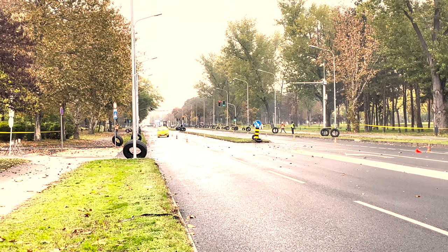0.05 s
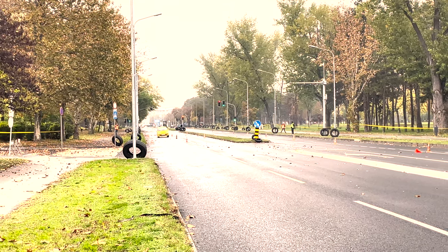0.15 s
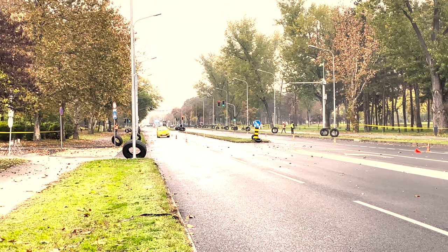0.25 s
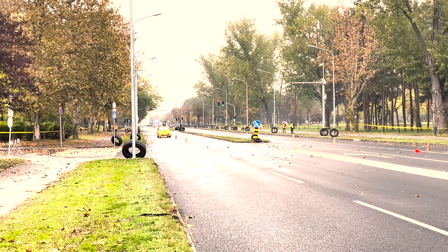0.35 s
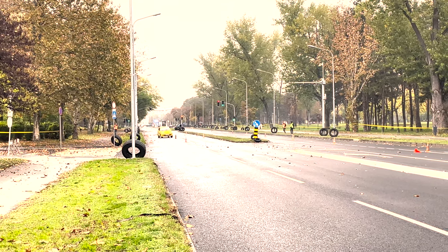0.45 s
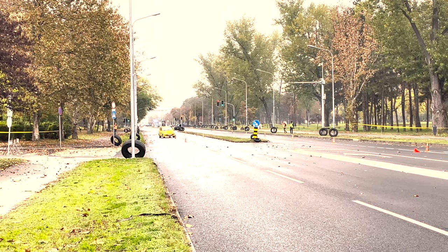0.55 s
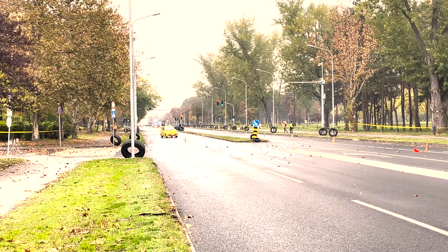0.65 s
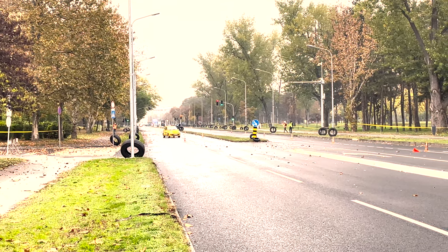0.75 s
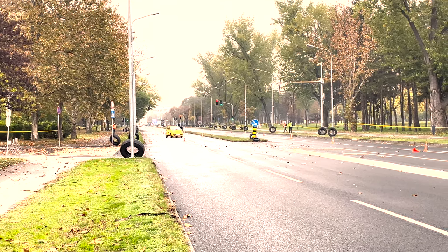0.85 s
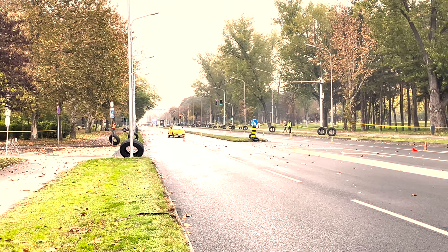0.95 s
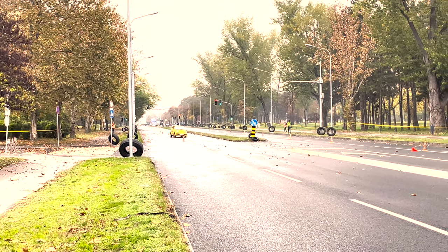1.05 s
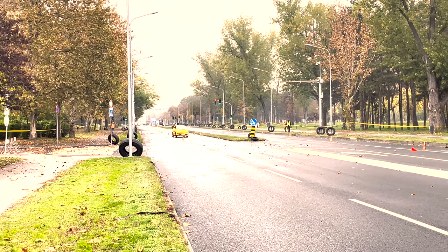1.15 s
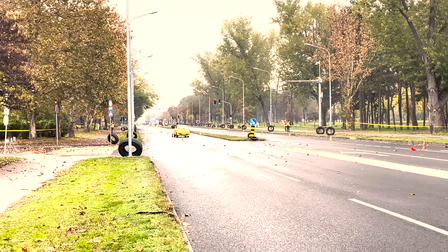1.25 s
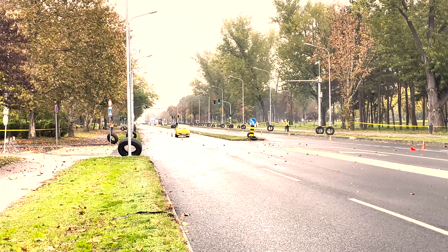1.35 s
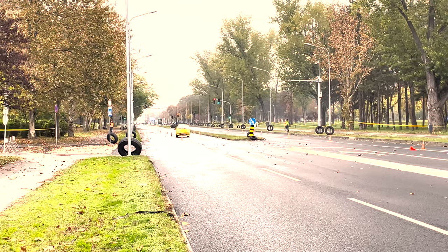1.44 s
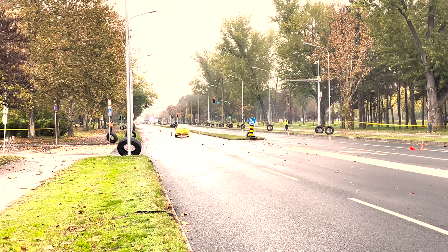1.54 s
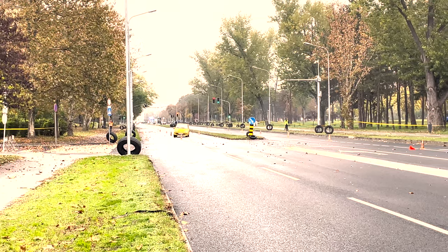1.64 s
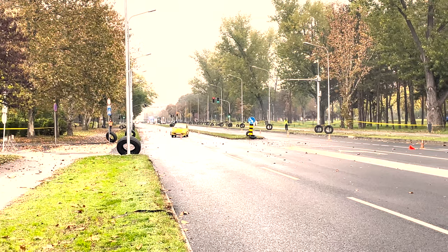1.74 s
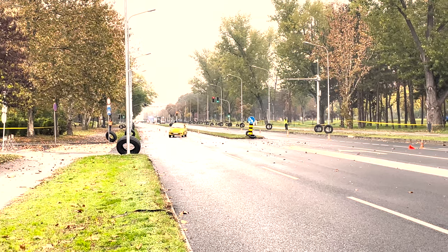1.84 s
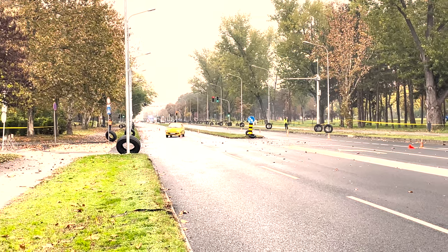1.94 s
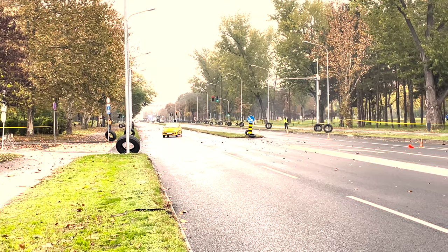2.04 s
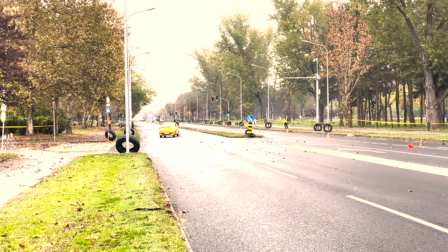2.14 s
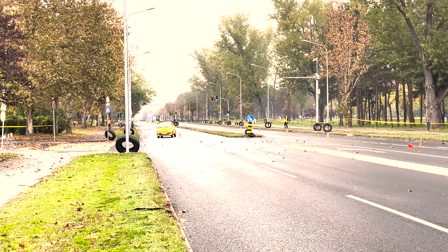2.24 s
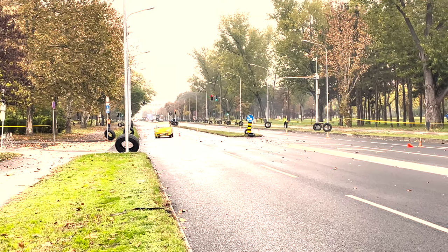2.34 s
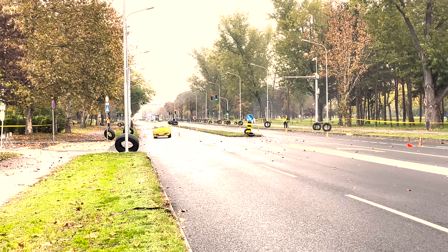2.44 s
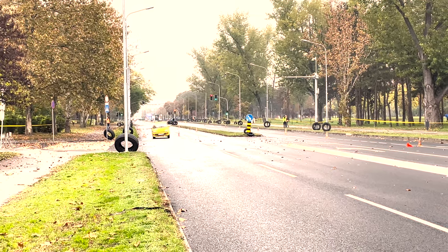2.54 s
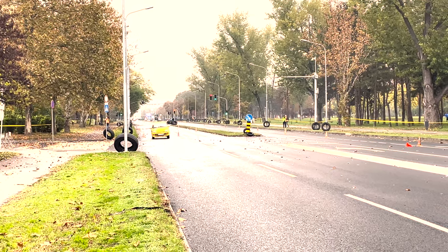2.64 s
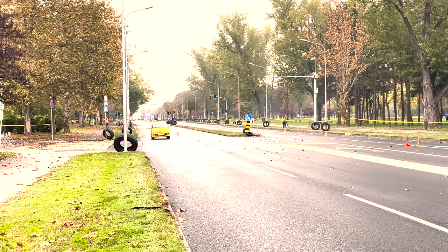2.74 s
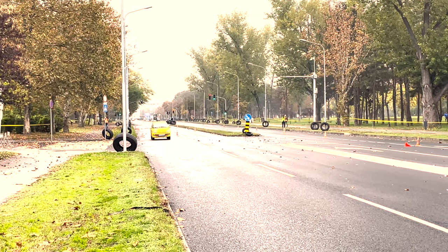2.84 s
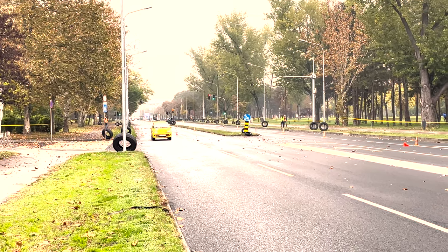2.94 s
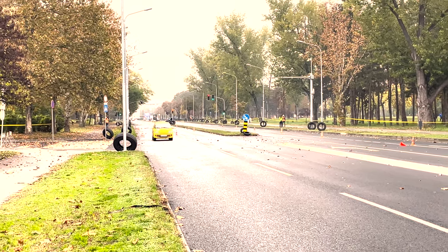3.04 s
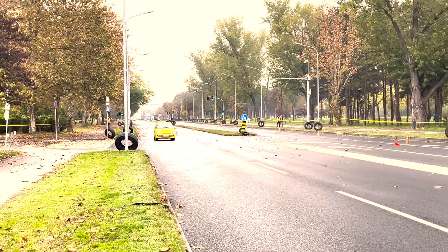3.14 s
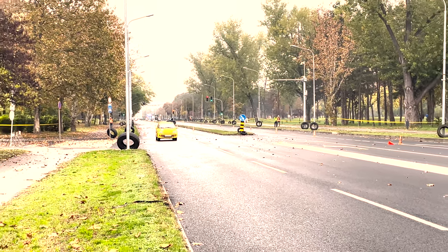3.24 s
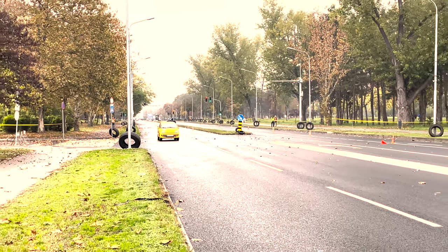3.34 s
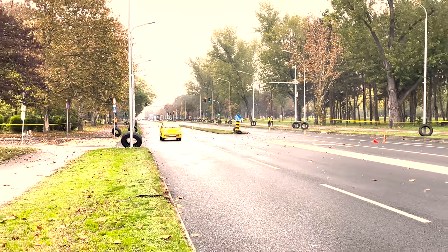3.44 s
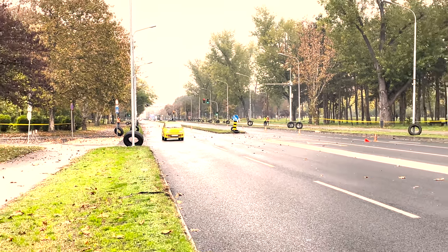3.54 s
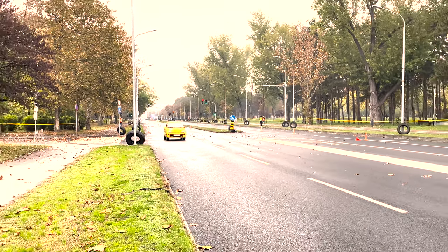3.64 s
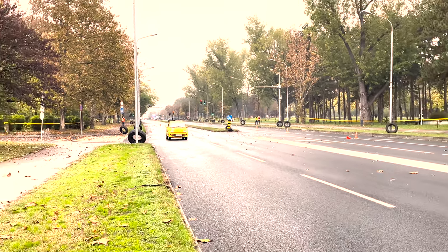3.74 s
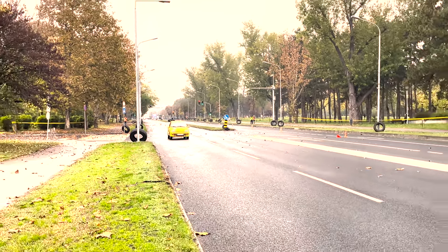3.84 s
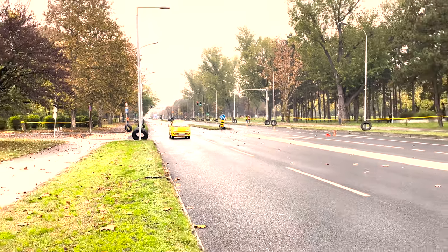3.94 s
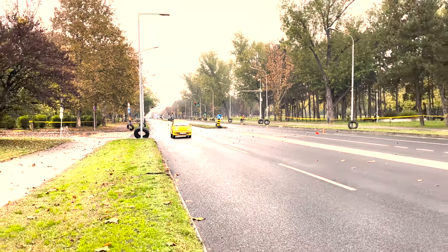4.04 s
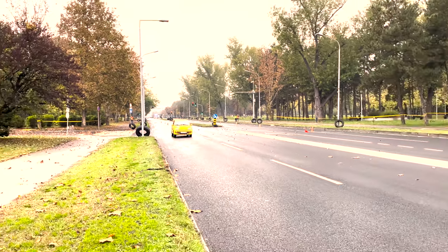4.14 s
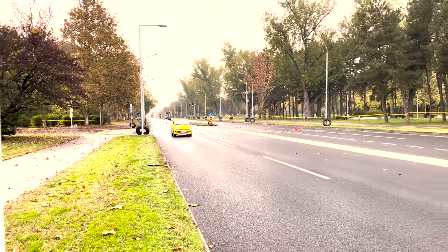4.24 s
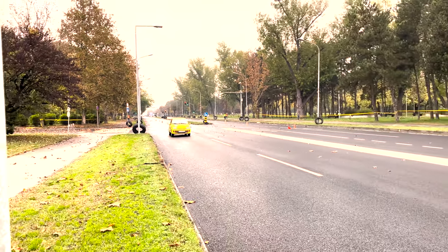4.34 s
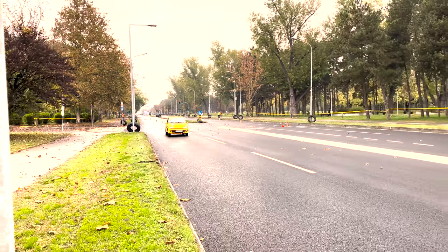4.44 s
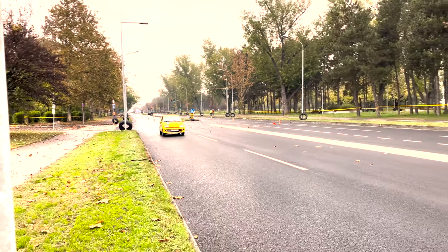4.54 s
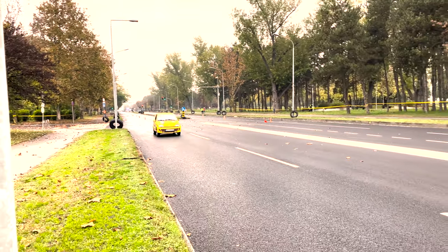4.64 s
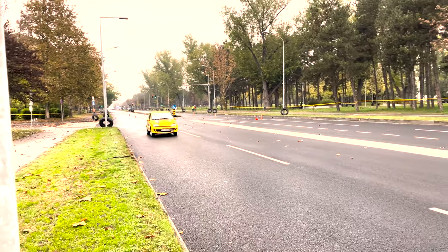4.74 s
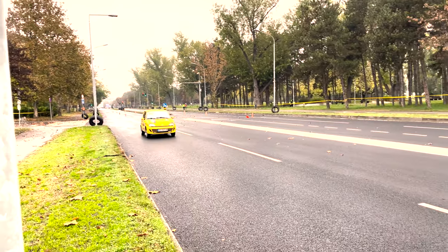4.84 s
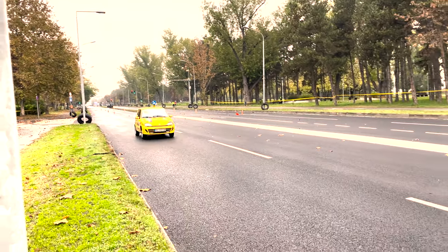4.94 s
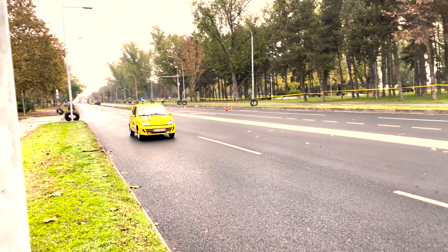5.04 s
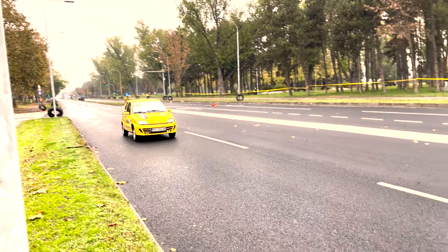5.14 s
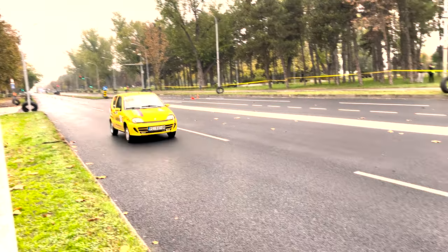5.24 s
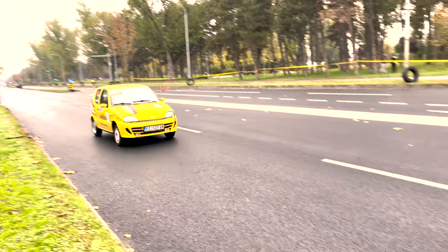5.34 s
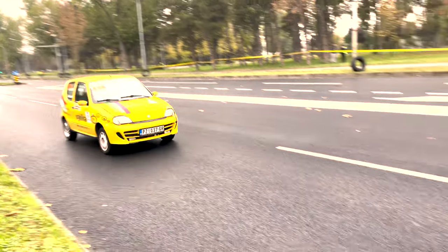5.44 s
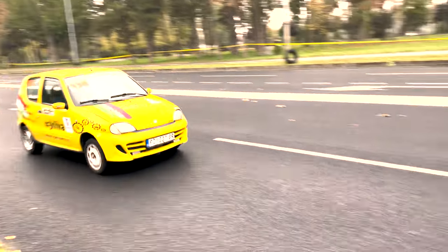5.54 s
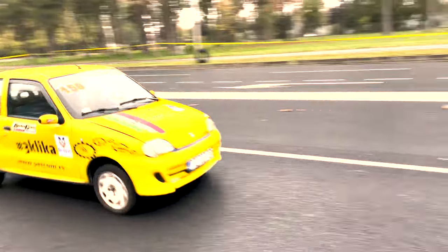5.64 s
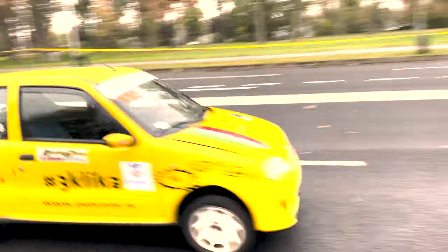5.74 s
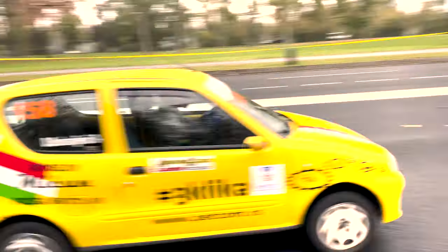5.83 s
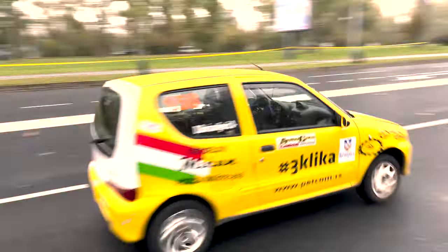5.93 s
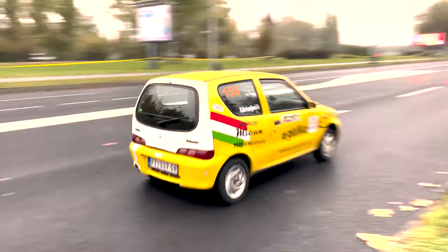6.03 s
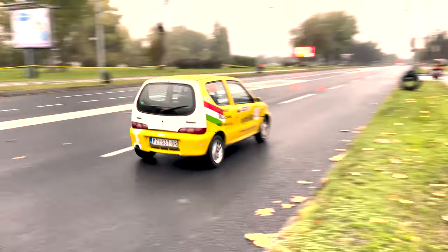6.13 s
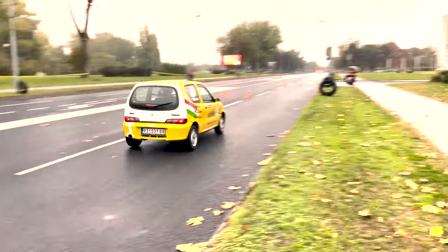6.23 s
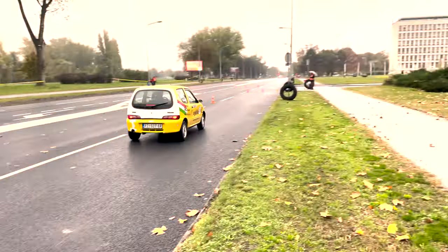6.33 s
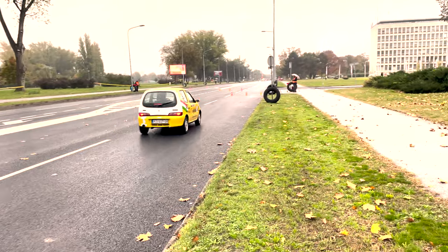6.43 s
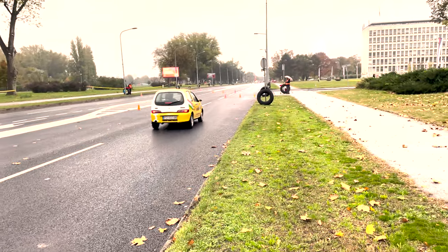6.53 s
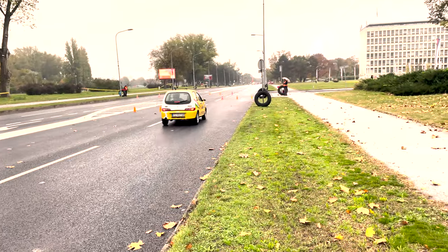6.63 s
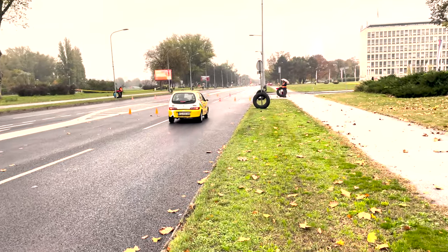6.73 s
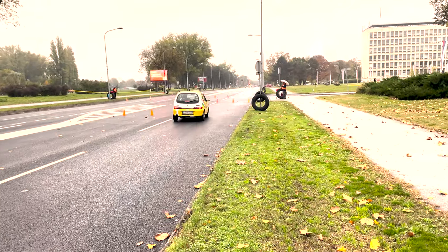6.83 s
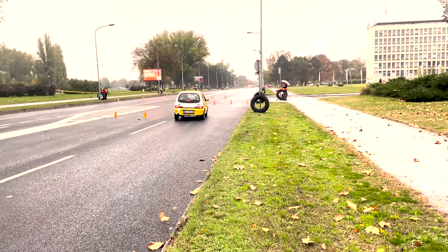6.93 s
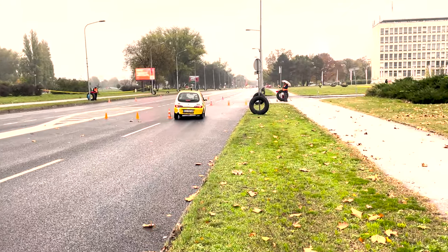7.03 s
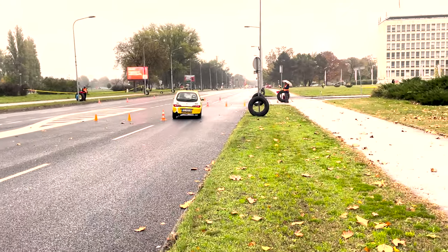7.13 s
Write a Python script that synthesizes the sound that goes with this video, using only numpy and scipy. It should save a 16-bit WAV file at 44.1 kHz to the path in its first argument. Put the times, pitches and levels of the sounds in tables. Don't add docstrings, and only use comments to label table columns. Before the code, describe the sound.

Far-off squeals and a rising engine, a small four-cylinder sweeps close by on wet asphalt, lifts off and fades among wind thumps.

```python
import sys
import numpy as np
from scipy import signal
from scipy.fft import rfft, irfft
from scipy.io import wavfile
from scipy.ndimage import uniform_filter1d, map_coordinates

SR = 44100
rng = np.random.default_rng(int(sys.argv[2]) if len(sys.argv) > 2 else 0)


def natural_amplitude(level_db):
    exponent = np.asarray(level_db, float) / 20
    return 10 ** exponent


def generate_wav(sig):
    pcm = np.round(np.clip(np.atleast_2d(sig).T, -1, 1) * 32767).astype(np.int16)
    wavfile.write(sys.argv[1], SR, pcm)


N = 316638


def unit(x):
    return x / np.sqrt(np.mean(x ** 2) + 1e-20)


def along(points, hz):
    f, v = np.transpose(points)
    return np.interp(np.log(hz + 1), np.log(f + 1), v)


def curves(rows):
    s, *cols = np.transpose(rows)
    return [np.interp(np.arange(N) / SR, s, c) for c in cols]


def bumps(rows, x):
    return sum(db * np.exp(-((x - centre) / width) ** 2) for centre, width, db in rows)


def phase(hz):
    return 2 * np.pi * np.cumsum(hz) / SR


def wobble(rate, step=1, size=N):
    fine = np.arange(0, size * rate / SR + 1, .125)
    smooth = map_coordinates(rng.standard_normal(len(fine) // 8 + 4), [fine])
    return np.interp(np.arange(0, size, step) * rate / SR, fine, smooth)


def filtered(x, response):
    m = (N // 8192 + 2) * 8192
    return irfft(rfft(x, m) * response(np.fft.rfftfreq(m, 1 / SR)), m)[..., :N]


def rush(spectrum, patchy_db):
    z = signal.stft(rng.standard_normal((2, N)), nperseg=512)[2]
    field = uniform_filter1d(rng.standard_normal(z.shape[1:]), size=6, axis=0)
    field = uniform_filter1d(field, size=12, axis=1)
    pair = signal.istft(z * natural_amplitude(patchy_db * unit(field)), nperseg=512)[1][:, :N]
    return unit(filtered(pair, lambda hz: natural_amplitude(along(spectrum, hz))))


def past(at_s=5.65, turn_s=0.54):
    return .5 + .5 * np.tanh((np.arange(N) / SR - at_s) / turn_s)


# (frequency [Hz], density [dB per Hz])
TRAFFIC_SPECTRUM = [(120, -120), (170, 2.5), (300, -1.5), (500, -5.5), (800, -17), (1500, -120)]


def traffic():
    return natural_amplitude(-49.5 + 1.6 * wobble(2.6)) * rush(TRAFFIC_SPECTRUM, patchy_db=1.5)


# (time [s], exhaust frequency [Hz], level [dB])
FOLLOWER_EXHAUST = [(0.0, 189.1, -48), (0.02, 189.1, -62), (0.03, 190.3, -46.5), (0.17, 190.3, -50),
                    (1.06, 199.8, -41.5), (1.63, 205.2, -43), (1.74, 204.9, -42.5), (2.3, 209.4, -44.5)]


def follower():
    hz, level_db = curves(FOLLOWER_EXHAUST + [(2.6, 207, -70)])
    line = natural_amplitude(level_db + 1.3 * wobble(12)) * np.sin(phase(hz))
    return np.array([line, np.roll(line, 310)])


# (time [s], level [dB])
BUFFETS = [(0, -45), (0.8, -39), (3.0, -39), (4.0, -36), (4.54, -40.5), (4.96, -35), (5.28, -39),
           (6.38, -41), (6.72, -45.5), (7.18, -46)]
# (frequency [Hz], density [dB per Hz])
RUMBLE_SPECTRUM = [(15, -120), (24, -29), (34, -21), (45, -6), (60, -6.5), (90, -11.5), (140, -15),
                   (300, -26.5), (600, -120)]
# (time [s], peak [dB], final frequency [Hz])
GUST_THUMPS = [(0.018, -28.5, 65.4), (0.261, -30.5, 56), (0.374, -31, 58), (0.471, -32, 52),
               (0.7, -27.5, 57.7), (0.76, -28, 57.7), (0.865, -24, 55.6), (1.026, -23.5, 54.7),
               (1.129, -33, 51.87), (1.408, -26, 63), (1.629, -29, 52.5), (1.79, -32, 48.2),
               (1.939, -28, 52), (2.07, -33, 62), (2.201, -27.5, 60.4), (2.349, -19, 64),
               (2.548, -28.5, 62.3), (2.612, -26, 57.8), (3.039, -18, 61.6), (3.271, -25, 52.4),
               (3.557, -35.5, 57.9), (3.861, -28, 80), (4.17, -24.5, 54), (4.442, -40, 60.2),
               (4.845, -23, 59), (4.934, -24, 66.4), (5.08, -33, 62.3), (5.502, -29, 80),
               (5.978, -21.5, 65), (6.282, -29, 62.15), (6.42, -29, 66.5)]


def wind():
    buffet_db, = curves(BUFFETS)
    out = natural_amplitude(buffet_db - 1.0) * unit(natural_amplitude(wobble(15)) * rush(RUMBLE_SPECTRUM, patchy_db=0.5))
    t = np.arange(SR // 8) / SR
    swell = t / 0.019 * np.exp(1 - t / 0.016)
    for s, db, hz in GUST_THUMPS:
        glide = 2 * np.pi * hz * (t + 0.012 * (1 - np.exp(-t / 0.0072)))
        ports = np.array([[1], [0.44 * np.sign(rng.standard_normal())]])
        out[:, round(s * SR):][:, :len(t)] += ports * natural_amplitude(db + 2.5) * swell * np.sin(glide) * 0.66
    return out


# (time [s], peak [dB], ring frequency [Hz], crack [dB])
GRIT_TICKS = [
    (0.9302, -55, 6900, -23),
    (3.6791, -40, 6600, -9),
    (6.538, -36, 6740, 3),
    (7.0219, -53, 7070, -9),
]


def ticks():
    out, t = np.zeros((2, N + SR)), np.arange(SR // 40) / SR
    for s, db, hz, crack_db in GRIT_TICKS:
        crack = natural_amplitude(crack_db + 9.5 - 60 * t / 0.048) * rng.standard_normal((2, len(t)))
        ring = np.sin(2 * np.pi * hz * t)
        out[:, round(s * SR):][:, :len(t)] += natural_amplitude(db - 60 * t / 0.02) * (crack + ring)
    return filtered(out[:, :N], lambda hz: 1 / (1 + (hz / 12300) ** 8) / (1 + (5500 / (hz + 1)) ** 8))


# (time [s], slip frequency [Hz], level [dB])
SQUEAL_TRACKS = [
    [(0, 1340, -31), (.008, 1340, -26), (.014, 1334, -29), (.026, 1422, -28), (.034, 1334, -33),
     (.038, 1273, -31), (.046, 1260, -30), (.052, 1264, -42), (.066, 1348, -38), (.073, 1446, -35),
     (.097, 1286, -37.5), (.107, 1250, -46), (.2, 1245, -49), (.24, 1280, -58), (.3, 1300, -68)],
    [(1.4, 1148, -56), (1.413, 1165, -41), (1.44, 1110, -39), (1.47, 1108, -45), (1.49, 1092, -33),
     (1.52, 1079, -38), (1.553, 1068, -34), (1.58, 1070, -39), (1.6, 1077, -31.5), (1.615, 1077, -36),
     (1.665, 1069, -31), (1.678, 1067, -42), (1.69, 1071, -38), (1.696, 1052, -31.5), (1.745, 1044, -32),
     (1.755, 1020, -44), (1.77, 1020, -36), (1.815, 1026, -34.5), (1.86, 1052, -41.5), (2.0, 1070, -47)],
]
OVERTONE_DB = (-2.5, -6.5)


def squeals():
    n = round(2.3 * SR)
    out, t = np.zeros(N), np.arange(n) / SR

    def shake(rate):
        return wobble(rate, size=n)

    for rows, over_db in zip(SQUEAL_TRACKS, OVERTONE_DB):
        ending = (rows[-1][0] + .08, rows[-1][1], -90)
        slip_hz, level_db = [c[:n] for c in curves(rows + [ending])]
        onset = np.clip((t - rows[0][0]) / 0.00045, 0, 1)
        slip = phase(slip_hz * (1 + .05 * shake(300)))
        over = 0.6 * shake(600) * np.sin(2 * slip) + 0.33 * shake(2400) * np.sin(2.3 * slip)
        over += 0.49 * shake(1100) * np.sin(1.4 * slip) + 0.072 * shake(2800) * np.sin(3.3 * slip)
        tone = (0.84 + 0.61 * shake(600)) * np.sin(slip)
        out[:n] += onset * natural_amplitude(level_db + 1.5 + 0.3 * shake(60)) * (tone + natural_amplitude(over_db) * over)
    return np.array([out, np.roll(out, 420)])


# (time [s], frequency [Hz], level [dB])
PASSING_BAND_TRACK = [(5.45, 2500, -66), (5.552, 2579, -24), (5.61, 2289, -49), (5.64, 2070, -21.5),
                      (5.69, 2200, -30), (5.739, 2480, -23), (5.77, 2506, -36), (5.79, 2520, -26),
                      (5.81, 2523, -35), (5.86, 2445, -37), (6.0, 2350, -37.5), (6.15, 2280, -33),
                      (6.2, 2250, -60)]


def passing_band():
    pitch_hz, level_db = curves([(0.0082, 2500, -120)] + PASSING_BAND_TRACK + [(6.3, 2246, -120)])
    turn = phase(pitch_hz)
    bands = [wobble(380) * np.cos(turn) + wobble(380) * np.sin(turn) for _ in range(2)]
    return natural_amplitude(level_db) * np.array(bands)


# (time [s], nearness [dB], wetness under the tyres [dB])
APPROACH = [(0, -47, -18.5), (0.84, -49, -14), (1.38, -43.5, -19.5), (1.7, -41, -21), (2.12, -41.5, -12),
            (2.32, -42, -15.5), (2.6, -41.5, -11), (2.9, -40.5, -11), (3.28, -38, -10.5),
            (3.55, -35, -12.5), (3.82, -32, -17), (4.18, -31, -15.5), (4.48, -29.5, -11.5), (4.88, -28, -4),
            (5.45, -24, 0), (5.76, -23, -0.5), (6.1, -30, -5), (6.44, -35, -7), (6.74, -38, -13.5),
            (7.18, -38.5, -17)]


def approach(law):
    over_db, growth, per_wet, gone_db = law
    near_db, wet_db = curves(APPROACH)
    return near_db + over_db + growth * (near_db + 35) + per_wet * (wet_db + 10) + gone_db * past()


# (time [s], crankshaft frequency [Hz], exhaust beat [dB])
ENGINE_SPEED = [(0, 64.05, -51), (0.24, 61.5, -46), (0.52, 64.15, -46), (1.02, 63.83, -42),
                (1.84, 76.9, -39), (2.02, 78.25, -38.5), (2.26, 71.7, -37.5), (2.4, 75.58, -38.5),
                (4.68, 97.46, -33.5), (5.36, 103.5, -23), (5.64, 104.5, -28), (5.78, 100.6, -22.5),
                (5.955, 97.7, -26.5), (6.0, 92.64, -36), (6.06, 91.26, -29), (6.18, 96.7, -25),
                (6.275, 93.1, -28), (6.33, 89.4, -36), (6.46, 86, -36.5), (6.86, 78.4, -48.5),
                (7.18, 77, -40)]


def crank():
    crank_hz, firing_db = curves(ENGINE_SPEED)
    return phase(uniform_filter1d(crank_hz, size=800)), firing_db


# (over nearness [dB], growth [dB per dB nearness], wetness [dB per dB], change once past [dB])
DRONE_LEVEL = (-0.66, -0.08, 0.17, 2.7)
ROAR_LEVEL = (0.033, 0.051, 0.0056, 0.1)
HISS_LEVEL = (0.091, 0.01, 1, 0.093)
SPRAY_LEVEL = (-11, 0.5, 0.73, 5.5)
# (frequency [Hz], density [dB per Hz])
DRONE_SPECTRUM = [(90, -120), (130, -2.5), (300, -2), (450, -7), (650, -0.5), (900, 0), (1300, -1.5),
                  (1700, -81), (2500, -120)]
ROAR_SPECTRUM = [(700, -120), (1000, -6.5), (1400, 2.5), (1900, 2.5), (2400, -2), (3200, -7.5),
                 (4200, -14.5), (6000, -120)]
HISS_SPECTRUM = [(2000, -120), (3000, 7), (3700, 1), (4500, -2.5), (5200, -3.5), (6300, -8.5), (7600, -9),
                 (8300, -8), (9200, -18), (11000, -120)]
SPRAY_SPECTRUM = [(6000, -120), (8000, -20), (9200, 8), (11000, -0.5), (13000, -7.5), (14300, -12),
                  (14900, -15), (15150, -120)]
# (time [s], length [s], level [dB])
WET_PATCHES = [
    (0.349, .1, 6),
    (2.1, 0.082, 2),
    (3.62, 0.3, 3.5),
    (7.03, 0.0303, 3),
]
# (time [s], length [s], level [dB])
NOISE_GUSTS = [
    (5.56, 0.0036, -5),
    (5.642, 0.017, 2),
    (5.744, 0.02, 1.5),
    (5.766, 0.011, -4),
    (5.822, 0.025, -2.5),
    (6.074, 0.011, -4.5),
]


def tyres(turn):
    t = np.arange(N) / SR
    firing = 1 + 0.057 * np.cos(2 * turn) + 0.04 * np.cos(turn)
    flutter = .4 * wobble(7)
    noise = natural_amplitude(approach(DRONE_LEVEL) - 3.0 + flutter) * firing * rush(DRONE_SPECTRUM, patchy_db=1.5)
    noise += natural_amplitude(approach(ROAR_LEVEL) + 0.23 + 0.35 * flutter) * firing * rush(ROAR_SPECTRUM, patchy_db=1.0)
    grit = natural_amplitude(0.96 * wobble(700) + 0.55 * wobble(22))
    noise += natural_amplitude(approach(HISS_LEVEL) - 7.5 + flutter / 2) * grit * rush(HISS_SPECTRUM, patchy_db=1.23)
    spray_db = approach(SPRAY_LEVEL) - 9 + bumps(WET_PATCHES, t)
    noise += natural_amplitude(spray_db + flutter / 2) * grit * rush(SPRAY_SPECTRUM, patchy_db=0.5)
    return natural_amplitude(bumps(NOISE_GUSTS, t)) * noise


# (multiple of crank frequency [1], level [dB], change after the lift-off [dB])
UPPER_ORDERS = [(1, -11.5, 1), (2.5, -16, 9), (4.5, -16, -12), (5, -16, 0), (5.5, -7, -9), (6, 1.5, 2),
                (6.5, -8.5, -17), (7, -6.5, -10), (7.5, -4.5, 5), (8, 1, -3), (8.5, -8, 5), (9, -1.5, -7),
                (9.5, -8, -1), (10.5, -10, -14), (11, -5.5, -5), (11.5, -12.5, -7), (12, -3.5, 2.5),
                (12.5, -11, -5), (13, -14.5, 1), (14, -9.5, -1), (15, -15, 2), (16, -4, -6), (17, -2, -12),
                (18, -2, -4), (19, 0.5, -25)]
# (frequency [Hz], gain [dB])
EXHAUST_PIPE = [(50, -1), (300, 1), (400, -5), (510, -9), (590, -3), (770, -1.5), (930, 0), (1300, -8),
                (1510, 1), (1800, -7), (2200, -9), (2700, -120)]


def exhaust_ring(turn):
    coarse, gone = 8, past()
    ragged_db = 1.8 + 1.5 * gone[::coarse]
    lifted = past(5.98, .06)[::coarse]
    shaken = (turn + .3 * gone * (1 - gone) * wobble(45))[::coarse]
    ring = np.zeros(N)
    for order, db, after_db in UPPER_ORDERS:
        level_db = db + after_db * lifted + ragged_db * wobble(9, step=coarse)
        ring[::coarse] += coarse * natural_amplitude(level_db) * np.sin(order * shaken + 6 * rng.random())
    return filtered(ring, lambda hz: natural_amplitude(along(EXHAUST_PIPE, hz)))


# (time [s], frequency [Hz])
GEAR_MESH = [(1.5, 2106), (2.02, 2240), (2.22, 2100), (2.62, 2250), (2.68, 2080), (2.74, 2272),
             (4.15, 2380), (4.22, 2779), (5.3, 2956)]


def gear_whine(level_db):
    mesh = phase(curves(GEAR_MESH)[0])
    return natural_amplitude(level_db + 1.5 * wobble(20)) * np.sin(mesh + .7 * wobble(40))


# (time [s], gear whine [dB], tenth order [dB], exhaust ring [dB], third order [dB])
STRAIN = [(0, -22, -28, 0.5, -1.5), (0.8, -19, -13, 1.5, -4.5), (1.4, -14, -21, 2, -4.5),
          (2.05, -4, -2.5, 1.5, -3), (2.2, -14.5, -16, 1.5, -3.5), (2.5, -5, -4.5, 0.5, -0.5),
          (3.5, -10, -10.5, -1, -1.5), (4.2, -22, -20, -2.5, -0.5), (4.8, -8.5, -13, -1, -1),
          (5.1, -35, -24, -1, -1.5), (5.3, -32, -20, 2, -1.5), (5.55, -28, -9, 3, -3.5),
          (5.67, -28, -4, -4.5, -1.5), (5.85, -32, -14, 0.5, -0.5), (5.99, -27, -9, -9, 2),
          (6.15, -26, 1, -2.5, -1), (6.45, -27, -4, -2, -6.5), (6.7, -27, -9, -9, 3.5),
          (6.9, -23, -2, 3.5, 6), (7.18, -32, -13, -1, 0)]
# (over nearness [dB], growth [dB per dB nearness], wetness [dB per dB], change once past [dB])
THIRD_LEVEL = (-4, -0.13, 0.33, -2.6)
FOURTH_LEVEL = (-11, -0.1, 0.67, -21)
RING_LEVEL = (-4, 0.25, 0.2, -1)
# (time [s], length [s], depth [dB])
THROTTLE_LIFTS = [
    (0.81, 0.04, -7),
    (0.98, 0.033, -12),
    (5.682, 0.02, -14),
    (6.003, 0.018, -18),
    (6.315, 0.02, -10),
]
# (time [s], length [s], level [dB])
LOAD_BARKS = [
    (2.7, .3, 6),
    (6.02, 0.067, 18),
    (6.27, 0.049, 19),
]


def engine(turn, firing_db):
    t = np.arange(N) / SR
    near_db = curves(APPROACH)[0]
    whine_db, tenth_db, ring_db, third_db = curves(STRAIN)
    lift_db = bumps(THROTTLE_LIFTS, t)
    unsteady = np.clip((-35 - near_db) / 6.2, .3, 4)
    beat_db = firing_db + lift_db + 3.0 + 1.34 * wobble(30) + 0.73 * unsteady * wobble(11)
    third_db = approach(THIRD_LEVEL) + third_db + 0.26 * lift_db + 3.0 + 0.58 * wobble(12)
    fourth_db = approach(FOURTH_LEVEL) + bumps(LOAD_BARKS, t) + 2.5 * wobble(8)
    tenth_db = near_db + tenth_db + 1.5 * wobble(14)
    lines = natural_amplitude(beat_db) * np.sin(2 * turn) + natural_amplitude(third_db) * np.sin(3 * turn + 1)
    lines += natural_amplitude(fourth_db) * np.sin(4 * turn + 2)
    lines += natural_amplitude(tenth_db) * np.sin(10 * turn + .35 * wobble(30))
    lines += natural_amplitude(approach(RING_LEVEL) + ring_db - 3) * exhaust_ring(turn)
    return lines + gear_whine(near_db + whine_db)


def car():
    turn, firing_db = crank()
    lines = engine(turn, firing_db)
    scattered = np.roll(lines, 310) * np.cos(2.54 * wobble(9))
    return tyres(turn) + np.array([lines, scattered])


def image(pair, table):
    hz, *cols = np.transpose(table)
    sign = np.array([[1], [-1]])

    def response(f):
        lead, alike, balance_db, colour_db = [np.interp(f, hz, c) for c in cols]
        spread = np.arccos(np.clip(alike, 0, 1)) / 2
        gain = natural_amplitude(colour_db + sign * balance_db / 2) * np.exp(-.5j * (1 - sign) * lead)
        return np.array([gain * np.cos(spread), gain * sign * np.sin(spread)])

    return filtered(pair[:, None], response).sum(axis=0)


# (frequency [Hz], width [Hz], gain [dB])
CASE_AHEAD = [(428, 59, -5), (1952, 140, -8), (2480, 880, 3.5), (3150, 220, -10), (3700, 120, 4.5),
              (3980, 95, -4.5), (5680, 210, -11), (6130, 190, 3.5), (7080, 100, -5.5), (7590, 320, -10.5),
              (8160, 310, -0.5)]
# (frequency [Hz], width [Hz], gain [dB])
CASE_BEHIND = [(1900, 180, 1), (2210, 100, -4), (2360, 130, -3), (3660, 270, -0.5), (5100, 410, 4),
               (6950, 140, 5), (8100, 250, 0.5)]
# (frequency [Hz], width [Hz], gain [dB])
CASE_AWAY = [(1000, 97, -12), (1800, 160, 4), (2080, 100, -5), (2480, 110, 0), (2820, 170, -3),
             (4500, 600, 1.5), (8100, 400, 0)]


def case(field):
    def colour(f):
        return natural_amplitude(np.cumsum([[bumps(rows, f)] for rows in (CASE_AHEAD, CASE_BEHIND, CASE_AWAY)], axis=0))

    ahead, behind, away = filtered(field, colour)
    return ahead + past() * (behind - ahead) + past(6.33, 0.17) * (away - behind)


# (time [s], long path [ms], its strength [1], short path [ms], its strength [1])
ECHO_PATHS = [(0, 0.76, 0.093, 0.65, 0.15), (3.85, 1.43, 0.015, 1, -0.15), (4.05, 1.39, 0.29, 0.65, -0.13),
              (5.2, 1.47, 0.2, 0.86, -0.1), (5.5, 1.35, 0.19, 0.65, -0.14), (5.62, 1.65, 0.1, 0.37, 0.26),
              (6.1, 1.1, 0.045, 0.44, 0.15), (6.4, 1.25, 0.28, 0.48, 0.13), (7.18, 1.49, 0.2, 0.47, -0.032)]


def echoes(x):
    long_ms, long_gain, short_ms, short_gain = curves(ECHO_PATHS)
    turn = 1.18 + past()
    out, n = x.copy(), np.arange(N)

    def band(hz):
        return 1 / (1 + (hz / 7000) ** 10) * hz ** 4 / (600 ** 4 + hz ** 4)

    def late(v, ms):
        return np.interp(n - ms * SR / 1000, n, v)

    copies = filtered(x, band)
    quarters = filtered(x, lambda hz: 1j * band(hz))
    ports = zip(out, copies, quarters, (0, .03), (0, 1.6), (1, .8))
    for row, copy, quarter, extra_ms, extra_turn, share in ports:
        turned = np.cos(turn + extra_turn) * copy + np.sin(turn + extra_turn) * quarter
        row += share * long_gain * late(turned, long_ms + extra_ms) + short_gain * late(copy, short_ms)
    return out


# (frequency [Hz], half width [Hz])
SUM_BAND = (5530, 260)
DIFFERENCE_BAND = (6520, 100)
# (time [s], share of sum [0-1], share of difference [0-1])
NULL_DEPTH = [(0, 0, 0), (3.95, 0, 0), (4.1, .85, .6), (4.8, .95, .6), (5.0, .99, .6), (5.33, .99, .6),
              (5.38, .5, .4), (6.2, .5, .3), (6.27, .9, .3), (6.35, .9, .3), (6.4, .6, .3), (6.46, .88, .3),
              (6.62, .88, .3), (6.7, .72, .3), (7.0, .72, .3), (7.1, .2, .3)]


def nulls(x):
    both = np.array([x[0] + x[1], x[0] - x[1]]) / 2

    def band(f):
        return [np.exp(-((f - hz) / width) ** 4) for hz, width in (SUM_BAND, DIFFERENCE_BAND)]

    wander = np.clip(1 - .12 * np.abs(wobble(14)), 0, 1)
    mid, side = both - wander * np.array(curves(NULL_DEPTH)) * filtered(both, band)
    return np.array([mid + side, mid - side])


# (frequency [Hz], left leads [rad], likeness [0-1], left-right [dB], colour [dB])
NARROW_IMAGE = [(90, 0, .62, .3, 0), (220, 0, .98, 1, 0), (800, .05, .92, 2.2, 0), (1500, 0, 1, 0, 0),
                (2250, 0, 1, 0, 0), (3200, .68, .96, .3, 0), (5200, .6, .92, 0, 0), (5800, -1.5, .85, 0, 0),
                (7000, -.8, .88, 0, 0), (7700, -2.3, .88, 0, 0), (8450, -3.14, 1, 0, 0),
                (9200, -3.3, .96, 0, -4), (12100, -5.3, .7, 0, 0), (12550, -6.28, 1, 0, 0)]
WIDE_IMAGE = [(90, 0, 0.7, 3, 0), (196, 0, 0.97, 4, 1), (1030, 0.73, 0.46, 6.5, -2),
              (1960, 1.87, 0.72, -2.5, -0.5), (2200, 1.21, 0.81, -1, 3), (3500, 3, 0.46, 2, 0),
              (4600, 2, 0.67, -1.5, 2), (5870, 5.5, 0.63, -4, 4.5), (6050, 4.5, 0.83, 3, 4.5),
              (8030, 4, 0.088, 12, 1), (9250, 3.14, .94, 0, -3), (10050, 3.0, .92, 0, -3),
              (11460, 1, 0.22, 1, -2), (12600, 0.5, 1, -1, 0.5)]
# (time [s], share of the wide image [0-1])
IMAGE_OPENING = [(0, 0.032), (3.6, 0.082), (3.95, 0.32), (4.06, 0.83), (7.18, 0.76)]


def scene():
    field = traffic() + follower() + wind() + ticks() + squeals() + passing_band() + car()
    wide = np.clip(curves(IMAGE_OPENING)[0], 0, 1)
    stereo = (1 - wide) * image(field, NARROW_IMAGE) + wide * image(case(field), WIDE_IMAGE)
    return nulls(echoes(stereo))


def band_limit(x):
    return signal.sosfilt(signal.butter(12, 15170, fs=SR, output="sos"), x)


def record(dry):
    mix = filtered(dry, lambda hz: hz < 15170)
    return band_limit(mix)


dry = scene()
out = record(dry)
generate_wav(out)
```